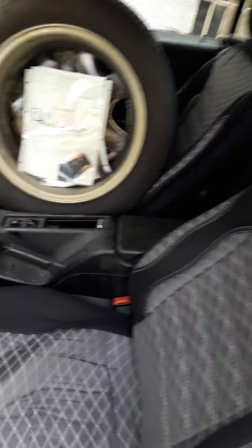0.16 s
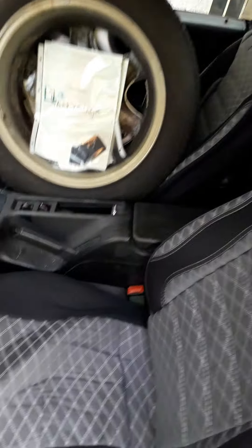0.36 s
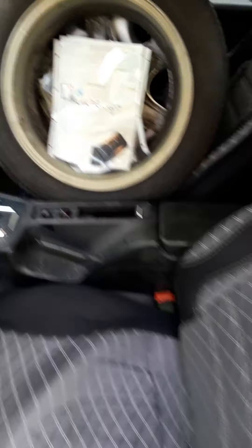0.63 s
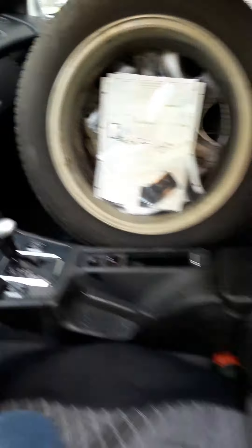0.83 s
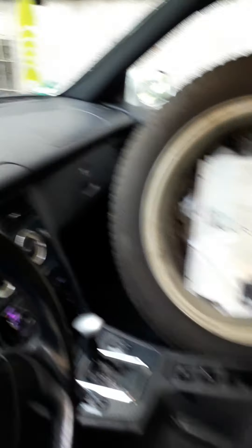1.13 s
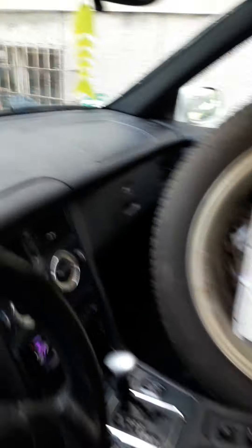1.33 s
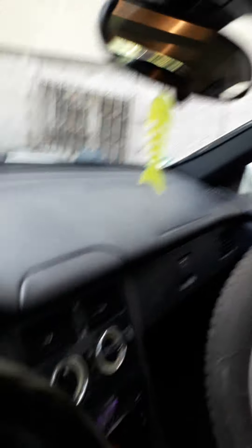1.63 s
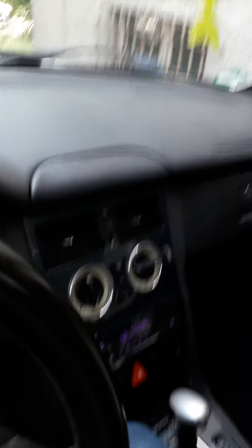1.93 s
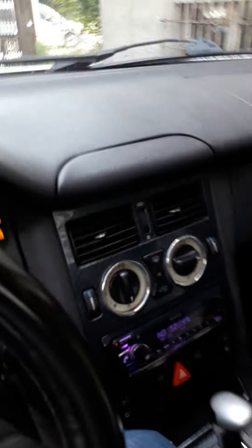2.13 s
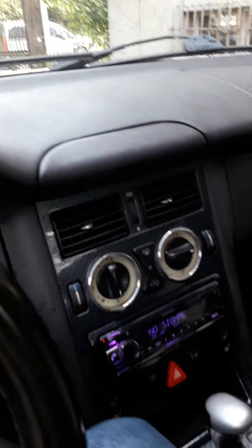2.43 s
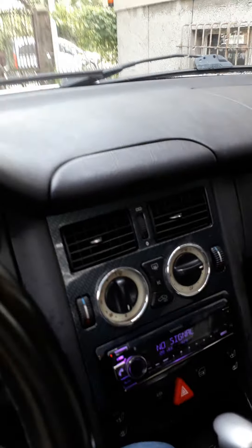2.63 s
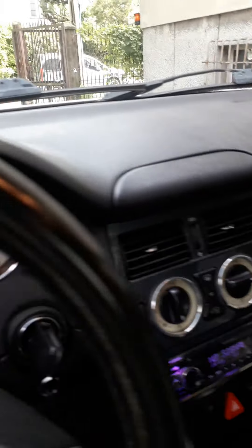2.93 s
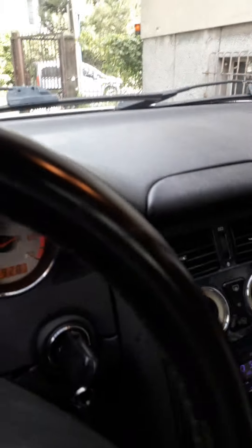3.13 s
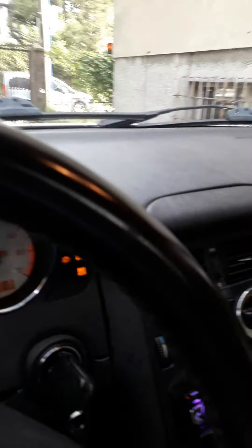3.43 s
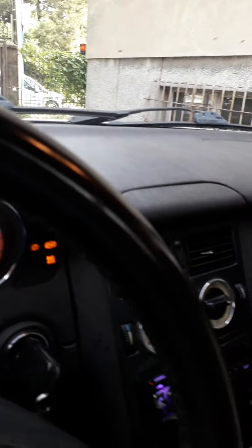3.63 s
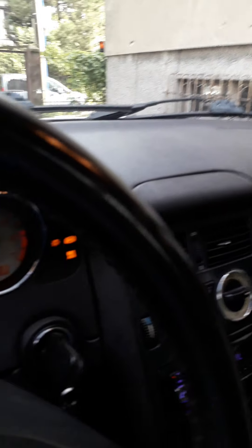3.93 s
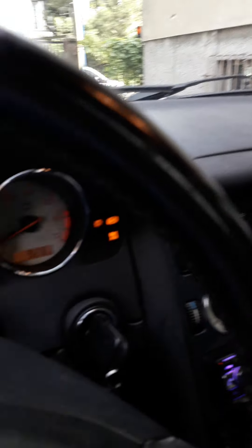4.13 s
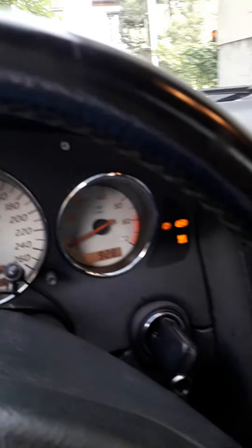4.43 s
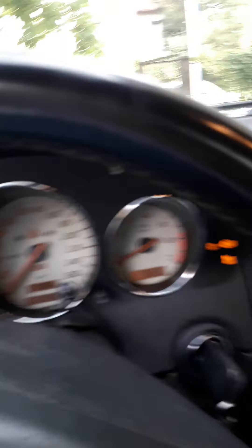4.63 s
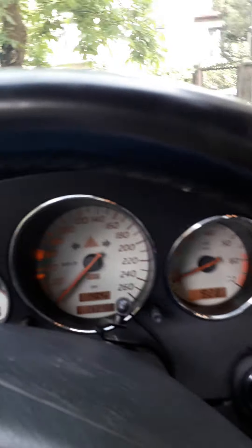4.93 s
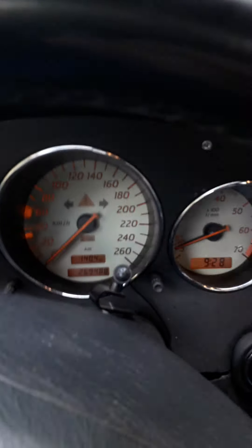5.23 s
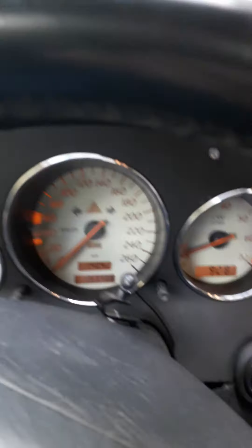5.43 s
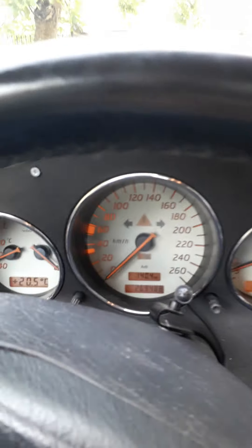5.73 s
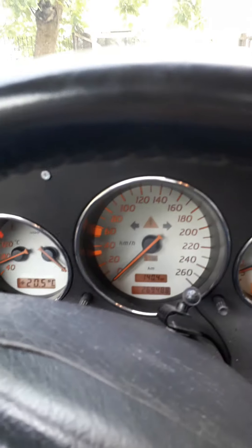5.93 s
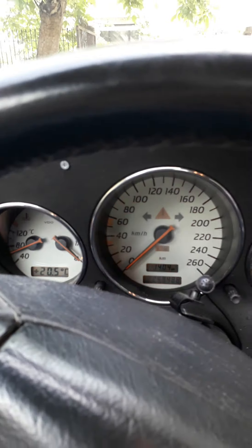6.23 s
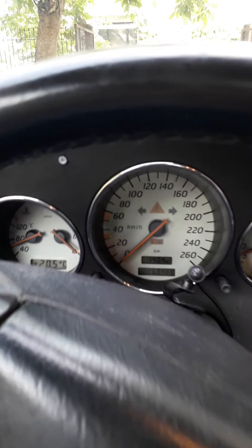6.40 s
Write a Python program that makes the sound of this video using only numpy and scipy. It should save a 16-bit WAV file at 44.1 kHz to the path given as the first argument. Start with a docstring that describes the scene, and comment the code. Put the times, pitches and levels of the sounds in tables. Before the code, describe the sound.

Open car door lets in street noise and a faint idle, seat rustles and plastic ticks, then a heavy rattling door slam, hush, two light clicks.

```python
"""Closing the door of a parked car

Through the open driver's door come street noise and an idling engine, both steady sounds that drift slowly.
Clothes brush the seat as short grainy noise; small things tick and knock as noise bursts with short rings.
The door is a chain of contacts: it latches, shudders on its seal and booms, shutting the street out.
Loose trim settles, and in the quiet a small sprung switch clicks twice, with a ringing spring."""
import sys
import numpy as np
from scipy import signal
from scipy.fft import rfft, irfft
from scipy.io import wavfile
from scipy.ndimage import uniform_filter1d

SR = 44100
rng = np.random.default_rng(int(sys.argv[2]) if len(sys.argv) > 2 else 0)


def dump_mix(stems):
    """Bounce the given channels to the path in sys.argv[1] as a 16-bit WAV at rate SR."""
    frames = np.atleast_2d(stems).T  # one column per channel
    limited = np.clip(frames, -1, 1)  # hard clip at full scale
    pcm = np.round(limited * 32767).astype(np.int16)
    wavfile.write(sys.argv[1], SR, pcm)


N = 289400
T = np.arange(N) / SR  # clock of the whole scene [s]
HIT_T = T[:SR]  # clock of one short sound, lasting a second [s]
TOP_HZ = 15900  # the finished sound stops here

# Every "colour" is the shape of a noise spectrum: (frequency [Hz], relative level [dB]).
# Levels in the tables are relative: the functions add fixed trims to many of them.

# Street through the doorway: (time [s], traffic level [dB], hiss level [dB])
STREET_LEVELS = [(0.0, -35.5, -38.5), (0.43, -35, -40.5), (1.4, -38.5, -42.5), (1.86, -35, -42.5),
                 (2.81, -38.5, -47.5), (3.44, -36, -44), (4.04, -37.5, -47.5), (4.54, -34.5, -45),
                 (5.13, -40, -49.5)]
STREET_SPECTRUM = [(53, -29.5), (90, -3.5), (196, -3.5), (278, -1), (620, -9.5), (1680, -10), (1950, -13.5),
                   (3220, -15.5), (4000, -14), (4860, -18.5), (7330, -22.5), (8910, -34.5), (12100, -27.5),
                   (16000, -38.5)]  # colour of the street: (frequency [Hz], level [dB])
# Resonances of the open cabin: (frequency [Hz], width [Hz], boost [dB])
CABIN_RESONANCES = [(270, 80, 1.5), (460, 24, 3), (990, 130, 4), (1710, 82, 4), (4010, 150, 5),
                    (7420, 1200, 3.5)]
SIZZLE_DB = -14  # the very top of the street, relative to its hiss
# Background with the door shut: (time [s], level [dB])
SHUT_LEVELS = [(5.68, -60.5), (6.328, -61.5), (6.56, -57)]
SHUT_SPECTRUM = [(15, -40), (25, -14), (92, 1), (236, -3), (677, -15), (1230, -19), (1740, -18.5),
                 (3160, -33), (7310, -37), (9070, -52.5), (16000, -38)]  # colour with the door shut: (frequency [Hz], level [dB])

# Engine idling nearby: (multiple of the firing rate, rms level before drift [dB])
IDLE_HARMONICS = [(1, -71.5), (2, -55.5), (3, -49), (4, -54.5), (6, -61), (7, -54.5), (9, -53.5)]
IDLE_HZ = 25.43  # average firing rate

# Cloth catching on the seat: (time [s], level [dB], treble lift [dB], length [s])
CLOTH_CATCHES = [(0.031, -21, -6, 0.0061), (1.262, -24, 16, 0.021), (1.292, -23, 22, 0.009),
                 (1.306, -21, 18, 0.014), (1.389, -24, -14, 0.032), (1.788, -27.5, 8, 0.017),
                 (1.986, -23.5, -25, 0.016), (2.083, -25, 10, 0.017), (2.123, -28.5, 35, 0.0095),
                 (2.604, -17, -16, 0.028), (2.644, -28.5, 11, 0.039), (2.709, -28.5, -25, 0.015),
                 (3.145, -28, -1, 0.021), (3.431, -28.5, -25, .013), (4.673, -29, -15, 0.049)]
CLOTH_SPECTRUM = [(600, -9), (1100, -4), (3000, 3), (5000, 0.5), (7600, 3.5), (9000, -14.5), (13000, -10),
                  (16000, -24)]  # colour of rubbed cloth: (frequency [Hz], level [dB])
# A sleeve sliding along the seat: moment of its peak, width of the swell, peak level
SLIDE_S, SLIDE_WIDTH_S, SLIDE_DB = 1.6, 0.87, -50
# Faint stirring of clothes: time span, loudest level, random drop below it, length
STIR_SPAN_S, STIR_DB, STIR_SPREAD_DB, STIR_LENGTH_S = (1.55, 2.35), -33, 1, 0.015

# Hard plastic ticking: (time [s], clack level [dB], edge level [dB], ring frequency [Hz], ring level [dB])
PLASTIC_TICKS = [(2.594, -18.5, -23, 1220, -19), (3.35, -28, -22, 1960, -16.5),
                 (3.707, -19.5, -28.5, 2220, -20), (3.727, -22, -20.5, 2220, -24),
                 (3.754, -15, -19.5, 2230, -17.5), (3.789, -20.5, -36, 2210, -25),
                 (3.843, -17, -30, 2060, -22), (4.017, -17, -33, 2210, -18), (4.14, -23.5, -26, 2170, -33),
                 (4.188, -25, -27.5, 1970, -32), (4.264, -19.5, -26.5, 1870, -24),
                 (4.323, -22, -27, 2180, -28), (4.37, -26, -31.5, 2280, -26),
                 (4.438, -23, -25.5, 2120, -33)]
# Ring of a tick: (multiple of the ring frequency, level [dB], time to fall 60 dB [s])
TICK_RING = [(.77, -6.5, .045), (1, 1, .065), (2.4, -11.5, .035)]
CLACK_SPECTRUM = [(450, -3.5), (820, -7), (1080, 3), (1300, -7), (1640, 1.5), (2300, -4), (2800, -12),
                  (5000, -14), (9000, -42)]  # colour of the hollow clack: (frequency [Hz], level [dB])
EDGE_SPECTRUM = [(2000, 0.5), (4300, -4.5), (5200, 2), (5800, -1), (7700, -4), (9200, -13.5),
                 (12500, -14.5), (16000, -22)]  # colour of the crisp edge: (frequency [Hz], level [dB])
# Every tick bounces once, more thinly: delay, change of the clack, change of the edge
BOUNCE_S, BOUNCE_CLACK_DB, BOUNCE_EDGE_DB = 0.011, -13.5, -6.5

# Blows on padded trim: (time [s], blow level [dB], ring level [dB], ring frequency [Hz], edge level [dB])
TRIM_KNOCKS = [(2.5, -25, -18, 221, -30), (4.492, -13, -21, 1007, -43), (4.532, -23, -23, 347, -26.5),
               (4.56, -22.5, -21.5, 202, -27), (4.608, -50, -18, 70.4, -33)]
KNOCK_SPECTRUM = [(230, -0.5), (330, 3.5), (480, 2.5), (700, 8), (1000, -0.5), (1400, -5.5), (2700, -9),
                  (3600, -35), (9000, -52)]  # colour of a dull blow: (frequency [Hz], level [dB])

# Switch contacts: (time [s], snap level [dB], spring ring level [dB])
SWITCH_CONTACTS = [(5.9924, -38.5, -25), (5.996, -29.5, -26), (5.9979, -33.5, -27), (6.1268, -36, -40),
                   (6.1306, -28.5, -20.5), (6.133, -29, -30), (6.154, -24.5, -40), (6.167, -36, -52)]
SNAP_SPECTRUM = [(100, -14), (200, 5), (450, -11.5), (900, -2.5), (1500, -0.5), (2000, -1), (4000, -0.5),
                 (6000, -2.5), (8000, -1.5), (9300, -22.5), (11500, -10.5), (16000, -22)]  # colour of the snap: (frequency [Hz], level [dB])
# Ring of the spring: (frequency [Hz], level [dB], time to fall 60 dB [s])
SPRING_RING = [(1545, -8.5, 0.045), (4120, -7.5, 0.027), (4780, -0.5, 0.038), (5040, 0.5, 0.039),
               (5180, -1.5, 0.036), (5340, 2, 0.031), (5590, -4, 0.028), (6540, -11.5, 0.055)]

CLASH_SPECTRUM = [(260, -27.5), (450, -8), (694, -2), (1020, -7.5), (1170, -12), (1380, -7), (2360, -7.5),
                  (3050, -10.5), (3430, -10.5), (5140, -16), (7250, -16), (9070, -31.5), (10800, -27),
                  (16000, -40.5)]  # colour of the metal clash: (frequency [Hz], level [dB])
THUD_SPECTRUM = [(13, -46.5), (22, -18.5), (75, 1.5), (190, -0.5), (234, -7), (305, -6), (425, -18.5),
                 (468, -25.5), (600, -24), (780, -52), (1320, -120)]  # colour of the panel thud: (frequency [Hz], level [dB])
# Pressure surge, cabin air and door panel: (frequency [Hz], level [dB], time to fall 60 dB [s])
DOOR_RING = [(29, -17, .3), (64, -1, 0.29), (79.1, 3.5, 0.35), (112, -6.5, 0.2), (139.3, -3, 0.5),
             (183.5, -4.5, 0.29), (205, -4, .2), (292, -4.5, 0.2), (318, -10.5, .2)]
# Ring of latch and steel frame: (frequency [Hz], level [dB], time to fall 60 dB [s])
LATCH_RING = [(332, 2.5, .12), (440, -1.5, .1), (610, -10.5, 0.12), (683, -1.5, 0.23), (713, 0, .14),
              (794, -3.5, .22), (845, -7, 0.12), (1024, -10, 0.14), (1837, -10, .14), (2326, -9, 0.22),
              (2650, -9.5, .2), (2871, -11.5, 0.17), (3290, -4.5, .16), (3520, -3.5, .12),
              (4800, -7.5, 0.13)]
# The latch meets the striker, rides over it and locks:
# (time [s], clash level [dB], clash treble lift [dB], latch ring level [dB], thud level [dB])
LATCH_CONTACTS = [(5.144, -42, 4.5, -56, -49.5), (5.163, -40, -16.5, -36, -28),
                  (5.171, -30.5, -0.5, -48, -42), (5.1875, -16.5, -7, -11, -20),
                  (5.207, -14, 16, -24.5, -13.5)]
# The locked door shudders against its seal: first contact and spacing, then its starting levels
SHUDDER_S, SHUDDER_PERIOD_S = 5.2245, .0188
SHUDDER_CLASH_DB, SHUDDER_TREBLE_DB, SHUDDER_RING_DB, SHUDDER_THUD_DB = -13, -2, -20.5, -12
# Lost by the last shudder, slowly at first; the latch ring sags with the clash
CLASH_SAG_DB, THUD_SAG_DB, TREBLE_SAG_DB = 7.5, 3.5, 7
ROCK_DB = 3  # inward swings thud harder and crack brighter; outward swings ring the latch
# Loose trim settling afterwards: (time [s])
SETTLE_TIMES = [5.333, 5.349, 5.39, 5.41, 5.466, 5.556]
SETTLE_CLASH_DB, SETTLE_TREBLE_DB, SETTLE_RING_DB, SETTLE_THUD_DB = -25.5, -16, -34.5, -26.5
SETTLE_DB_PER_S = 193  # how fast the settling clash, ring and thud weaken


def undb(db):
    """Turn decibels into a gain."""
    return 10 ** (np.asarray(db) / 20)


def unit(x):
    """Scale a sound to an average strength (rms) of 1."""
    return x / np.sqrt(np.mean(x ** 2))


def curve(rows, column=1):
    """Join one column of a timed table with straight lines."""
    rows = np.array(rows)
    return np.interp(T, rows[:, 0], rows[:, column])


def fade(t60):
    """Die away evenly in decibels, 60 dB down after t60 seconds."""
    return np.exp(-np.log(1000) * HIT_T / t60)


def soft_start(rise_s):
    """Rise quickly from silence, since nothing starts moving at once."""
    return 1 - np.exp(-HIT_T / rise_s)


def add(out, s, sound):
    """Mix a sound in at time s."""
    i = int(s * SR)
    out[i:i + len(sound)] += sound[:N - i]


def noise(colour, size, treble_db=0, peaks=()):
    """Noise of rms 1 with a given colour, a treble lift or cut, and resonances."""
    hz = np.maximum(np.fft.rfftfreq(size, 1 / SR), 1)
    points = np.array(colour)
    db = np.interp(np.log(hz), np.log(points[:, 0]), points[:, 1])
    # below the first point the sound falls by 24 dB per octave
    db = db - 24 * np.maximum(np.log2(points[0, 0] / hz), 0)
    # half of the treble change is reached at 4000 Hz
    db = db + treble_db * hz ** 2 / (hz ** 2 + 4000 ** 2)
    for centre, width, peak_db in peaks:
        db = db + peak_db / (1 + (2 * (hz - centre) / width) ** 2)
    random_phase = np.exp(2j * np.pi * rng.random(len(hz)))
    return unit(irfft(undb(db) * random_phase, size))


def ring(modes, detune=0.0025):
    """A struck object rings at several fading pitches, slightly detuned each time."""
    out = np.zeros(SR)
    for k, (hz, db, t60) in enumerate(modes):
        pitch = hz * (1 + detune * rng.standard_normal())
        sign = (-1) ** k
        out += sign * undb(db) * fade(t60) * np.sin(2 * np.pi * pitch * HIT_T)
    return out


def walk(rate):
    """Slow random drift of rms 1, made of random steps (rate per second) smoothed twice."""
    k = int(SR / rate)
    steps = np.repeat(rng.standard_normal(N // k + 1), k)
    smooth = uniform_filter1d(uniform_filter1d(steps, k), k)
    return unit(smooth[:N])


def chatter(spread_db, rate):
    """Uneven gain of rms 1: loose parts touch and part at random."""
    k = max(int(SR / rate), 1)
    steps = np.repeat(undb(spread_db * rng.standard_normal(SR // k + 1)), k)
    return unit(uniform_filter1d(steps, k // 4 + 1)[:SR])


def reflections(x, count=40):
    """Glass and trim return the sound within 30 ms, combing its spectrum; seats soak up treble."""
    lags = rng.uniform(.002, .03, count)
    sizes = rng.standard_normal(count)
    response = np.zeros(SR // 30)
    response[(lags * SR).astype(int)] = undb(-7) * sizes / np.linalg.norm(sizes)
    response = signal.sosfilt(signal.butter(1, 3000, fs=SR, output="sos"), response)
    response[0] = 1  # the direct sound
    return signal.fftconvolve(x, response)[:len(x)]


def idle():
    """An idling engine hums at multiples of its firing rate, and its speed wanders slightly."""
    turns = np.cumsum(IDLE_HZ * (1 + .004 * walk(2))) / SR
    out = np.zeros(N)
    for k, db in IDLE_HARMONICS:
        level = np.sqrt(2) * undb(db + walk(2))
        out += level * np.sin(2 * np.pi * (k * turns + rng.random()))
    return out


def street(shut_s=5.194, closing_s=0.13):
    """Traffic, leaves and engine fade as the gap closes; a dull remainder comes through the body."""
    air = reflections(noise(STREET_SPECTRUM, N, treble_db=4.0, peaks=CABIN_RESONANCES))
    spectrum, hz = rfft(air), np.fft.rfftfreq(N, 1 / SR)

    def band(low, high):
        """One slice of the street's spectrum, at rms 1."""
        return unit(irfft(spectrum * (hz >= low) * (hz < high), N))

    traffic, hiss, sizzle = band(0, 2800), band(2800, 8500), band(8500, SR)
    treble_level = undb(curve(STREET_LEVELS, column=2) - 1.17 + .4 * walk(12))
    treble = (hiss + undb(SIZZLE_DB) * sizzle) * treble_level
    traffic_level = undb(curve(STREET_LEVELS) - 0.7 + 0.99 * walk(7.1))
    outside = idle() + traffic * traffic_level + treble
    shut_peaks = [(684, 110, 8.6), (1680, 120, 3), (4000, 450, 5)]  # (frequency [Hz], width [Hz], boost [dB])
    inside = reflections(noise(SHUT_SPECTRUM, N, treble_db=3.5, peaks=shut_peaks))
    # 1 while the door is open, 0 once it meets its seal
    gap = np.clip((shut_s - T) / closing_s, 0, 1) ** .5
    return gap * outside + (1 - gap) * inside * undb(curve(SHUT_LEVELS) + 3.5)


def scrape(db, treble_db, length):
    """Cloth catches and slips: one short grainy scrape."""
    stroke = soft_start(0.00059) * np.exp(-(HIT_T / length) ** 2)
    grain = chatter(spread_db=4, rate=700)
    return undb(db - 6) * stroke * grain * noise(CLOTH_SPECTRUM, SR, treble_db)


def clothes(count=4):
    """Cloth slides smoothly over the seat, catches distinctly and stirs at random moments."""
    swell = np.exp(-((T - SLIDE_S) / SLIDE_WIDTH_S) ** 2)
    out = undb(SLIDE_DB) * swell * noise(CLOTH_SPECTRUM, N, treble_db=30)
    for s, db, treble_db, length in CLOTH_CATCHES:
        add(out, s, scrape(db, treble_db, length))
    for s in rng.uniform(*STIR_SPAN_S, count):
        add(out, s, scrape(STIR_DB - STIR_SPREAD_DB * rng.random(), 8.6, STIR_LENGTH_S))
    return out


def edge(t60=.035):
    """The crisp onset of a hard plastic contact: a very short bright burst."""
    return noise(EDGE_SPECTRUM, SR) * fade(t60) * soft_start(0.00028)


def ticks(clack_t60=0.053):
    """Small plastic contacts: a crisp edge and a hollow clack with a short ring, then a weaker bounce."""
    out = np.zeros(N)
    bounces = [(0, 0, 0), (BOUNCE_S, BOUNCE_CLACK_DB, BOUNCE_EDGE_DB)]
    for s, clack_db, edge_db, hz, ring_db in PLASTIC_TICKS:
        modes = [(ratio * hz, ring_db + db, t60) for ratio, db, t60 in TICK_RING]
        for delay, body_db, crisp_db in bounces:
            burst = undb(clack_db - 1.5) * noise(CLACK_SPECTRUM, SR) * fade(clack_t60)
            clack = (burst + ring(modes)) * soft_start(.00036)
            crisp = undb(edge_db + crisp_db) * edge()
            add(out, s + delay, undb(-4.5) * (undb(body_db) * clack + crisp))
    return out


def knocks():
    """Padded trim is hit: a dull burst, a slight edge and one panel ring that builds up within a cycle."""
    out = np.zeros(N)
    for s, blow_db, ring_db, hz, edge_db in TRIM_KNOCKS:
        blow = undb(blow_db) * noise(KNOCK_SPECTRUM, SR, -1) * fade(0.062) * soft_start(0.00043)
        panel = undb(ring_db) * ring([(hz, 0, .1)]) * soft_start(1 / (2.5 * hz))
        add(out, s, blow + panel + undb(edge_db - 3.0) * edge())
    return out


def switch(snap_t60=0.053, cabin_t60=0.1):
    """A spring snaps over and rings; the housing clacks and the cabin answers more dully."""
    out = np.zeros(N)
    for s, snap_db, spring_db in SWITCH_CONTACTS:
        snap = noise(SNAP_SPECTRUM, SR) * fade(snap_t60)
        cabin = noise(SNAP_SPECTRUM, SR, -37) * fade(cabin_t60) * undb(-10)
        spring = undb(spring_db) * ring(SPRING_RING, detune=0.0083)
        add(out, s, undb(snap_db) * (snap + cabin) + spring)
    return out


def contacts(count=5):
    """List the latching, shuddering and settling contacts, with the columns of LATCH_CONTACTS."""
    rows = list(LATCH_CONTACTS)
    for k in range(count):
        spent = (k / (count - 1)) ** 2
        rock_db = ROCK_DB * (-1) ** k  # positive on inward swings
        rows.append((SHUDDER_S + k * SHUDDER_PERIOD_S,
                     SHUDDER_CLASH_DB - CLASH_SAG_DB * spent,
                     SHUDDER_TREBLE_DB - TREBLE_SAG_DB * spent + rock_db,
                     SHUDDER_RING_DB - CLASH_SAG_DB * spent - rock_db,
                     SHUDDER_THUD_DB - THUD_SAG_DB * spent + rock_db))
    for s in SETTLE_TIMES:
        lost_db = SETTLE_DB_PER_S * (s - SETTLE_TIMES[0])
        rows.append((s,
                     SETTLE_CLASH_DB - lost_db,
                     SETTLE_TREBLE_DB,
                     SETTLE_RING_DB - lost_db,
                     SETTLE_THUD_DB - lost_db))
    return rows


def door(clash_t60=0.12, thud_t60=.12, tail_t60=0.35, boom_t60=0.75):
    """Latch, striker and seal meet in quick succession; each contact clashes, thuds and shakes loose trim."""
    metal, body = np.zeros(N), np.zeros(N)
    for s, clash_db, treble_db, latch_db, thud_db in contacts():
        rattle = undb(-14.5) * fade(tail_t60) * chatter(spread_db=7.5, rate=100)
        crack = undb(-3) * fade(.015)
        clash_shape = crack + fade(clash_t60) * chatter(spread_db=2.5, rate=250) + rattle
        clash = noise(CLASH_SPECTRUM, SR, treble_db) * clash_shape
        add(metal, s, undb(clash_db) * clash + undb(latch_db - 5.5) * ring(LATCH_RING))
        # the sealed cabin booms on after the panel has settled
        boom_shape = undb(1.5) * fade(thud_t60) + undb(-21.5) * fade(boom_t60)
        boom = noise(THUD_SPECTRUM, SR, peaks=[(150, 70, 1.5)]) * boom_shape
        # the heavy panel takes a few milliseconds to get moving
        thud = (boom + undb(-6) * ring(DOOR_RING, detune=0.0037)) * soft_start(0.0017)
        add(body, s, undb(thud_db) * thud)
    return metal + body


def scene():
    """Add up everything heard from the driver's seat, in one channel."""
    return (street() + clothes() + ticks() + knocks() + door() + switch())[None]


def record(dry):
    """Flatten peaks beyond full scale, then steeply cut the sound above TOP_HZ."""
    clipped = np.clip(dry, -1, 1)
    top_cut = signal.ellip(8, .2, 70, TOP_HZ, fs=SR, output="sos")
    return signal.sosfilt(top_cut, clipped)


dry = scene()
out = record(dry)
dump_mix(out)
```